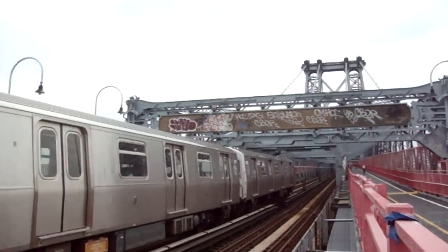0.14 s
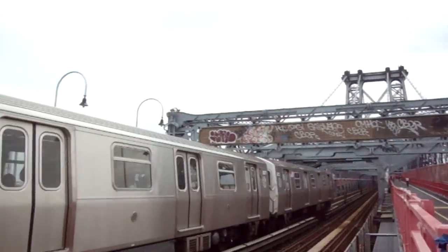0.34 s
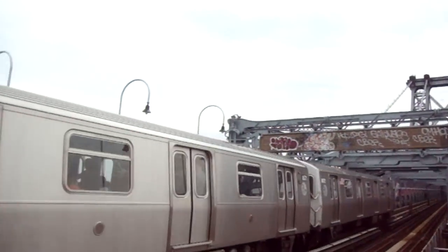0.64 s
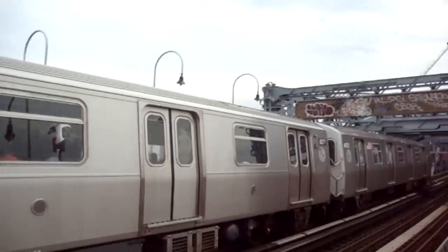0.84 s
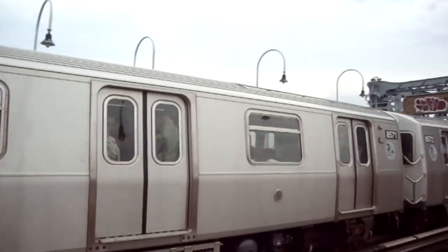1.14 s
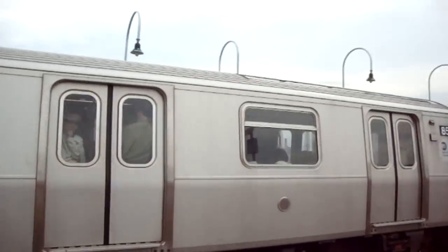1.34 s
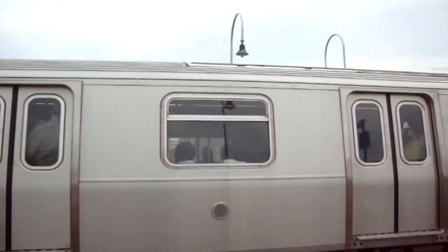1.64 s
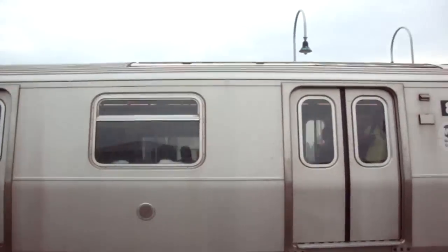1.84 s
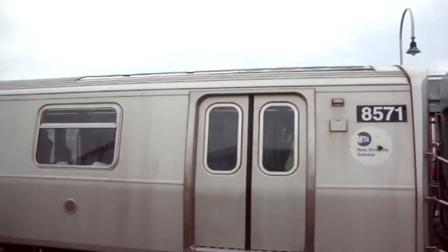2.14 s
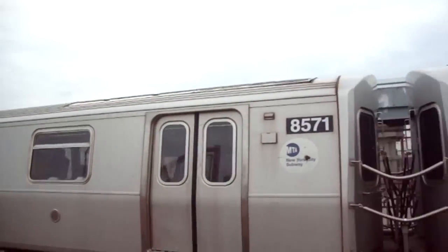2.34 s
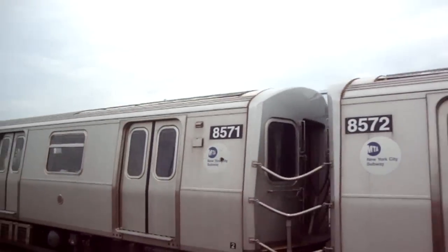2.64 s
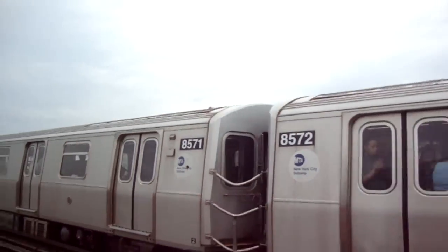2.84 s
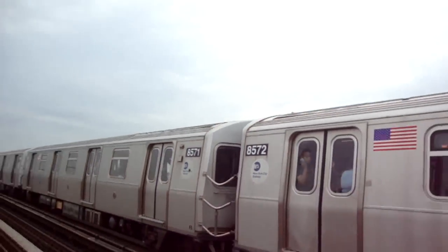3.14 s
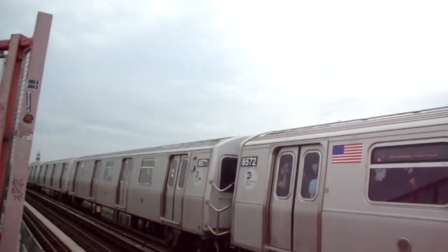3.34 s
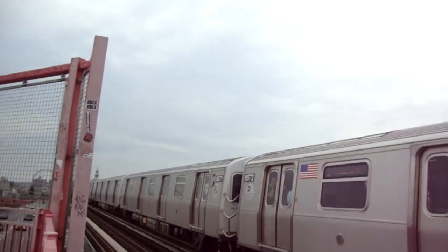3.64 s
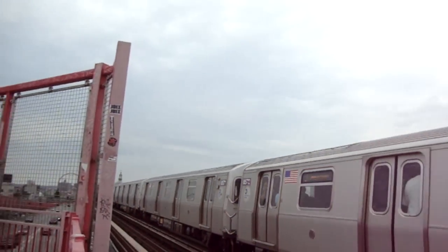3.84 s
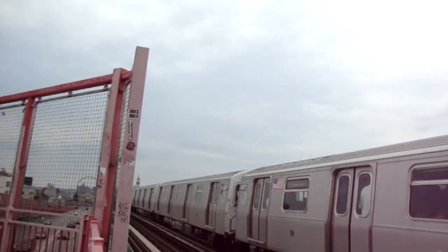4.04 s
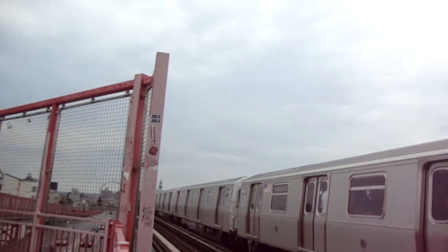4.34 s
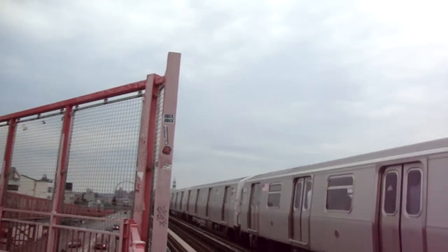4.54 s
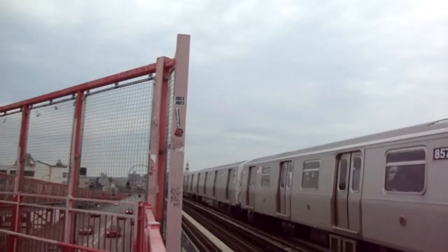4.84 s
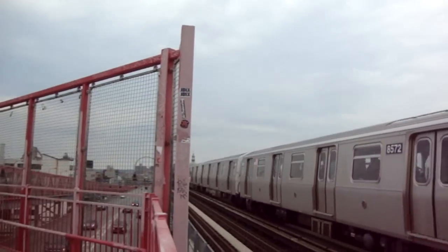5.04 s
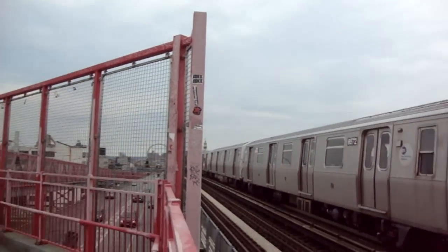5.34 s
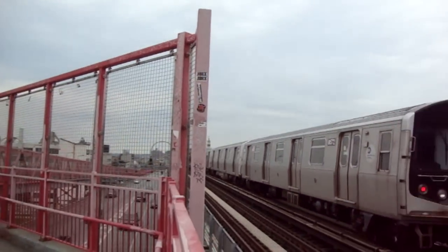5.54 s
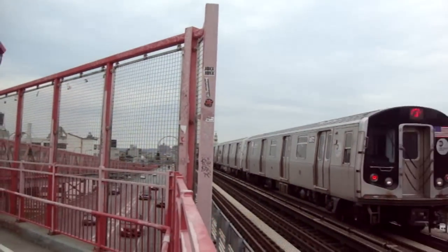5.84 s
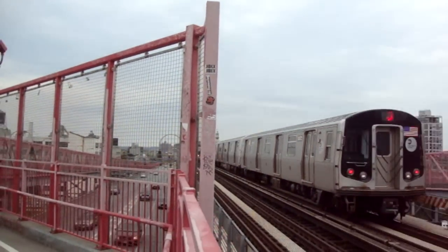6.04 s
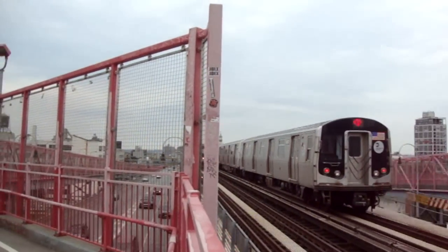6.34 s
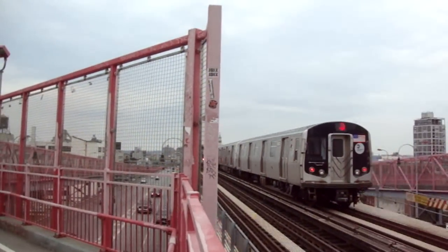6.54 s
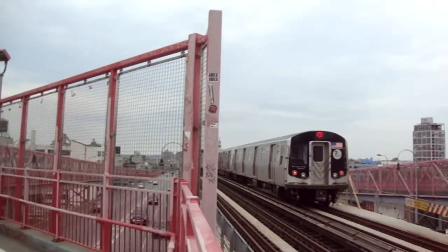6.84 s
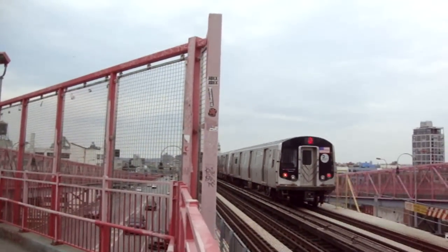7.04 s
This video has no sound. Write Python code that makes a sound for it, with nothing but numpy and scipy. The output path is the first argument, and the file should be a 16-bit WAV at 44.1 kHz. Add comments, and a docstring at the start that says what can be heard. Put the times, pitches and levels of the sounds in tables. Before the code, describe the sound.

Loud, steady steel-on-steel roar of a passing metro train, with rattling double clanks at rail joints, groaning girders and a thin motor whine near the end.

```python
"""First comes the roar of a subway train on a steel bridge, heard from a walkway a few metres away.
Rough wheels shake rail and deck (filtered noise); at rail joints they clash, thud and rattle (noise bursts
and short sine chords). Flanges scrape in swells of noise, and now and then a wheel sings (narrow resonance).
Rail and girders groan on a moving resonance; near the end a low drone and a faint drive whine appear."""
import sys
import numpy as np
from scipy import signal
from scipy.fft import rfft, irfft, next_fast_len
from scipy.io import wavfile
from scipy.ndimage import uniform_filter1d

SR = 44100
rng = np.random.default_rng(int(sys.argv[2]) if len(sys.argv) > 2 else 0)


def to_wav(s):
    """Save 16-bit WAV."""
    ch = np.atleast_2d(s).T  # columns
    pcm = np.round(np.clip(ch, -1, 1) * 32767)  # PCM
    wavfile.write(sys.argv[1], SR, pcm.astype(np.int16))


N = 316631
T = np.arange(N) / SR
FFT_SIZE = next_fast_len(N, real=True)
HZ = np.maximum(np.arange(FFT_SIZE // 2 + 1) * SR / FFT_SIZE, 1)

# rumble, hiss and sizzle start a steady extra fade at this moment
PASS_S = 1.05
RUMBLE_FADE_DB_PER_S, HISS_FADE_DB_PER_S, SIZZLE_FADE_DB_PER_S = 0.3, 0.77, 2
# the two axles of a bogie (a wheel frame under the car) reach the same spot one after the other
AXLE_GAP_S = 0.271

# swell of the rolling wheels as each pair of bogies comes by: (time [s], base level [dB])
ROLLING_LEVEL = [(0, -20), (.25, -19), (1.1, -19.5), (1.62, -23), (1.85, -23.5), (2.05, -21), (2.35, -21.5),
                 (2.65, -19.5), (3.15, -21), (3.65, -20), (3.92, -21.5), (4.22, -19), (4.9, -20.5),
                 (5.45, -22), (5.95, -18.5), (7.18, -18)]
MEAN_ROLL_DB = -20.5


def rolling():
    """Rough wheel and rail make the rail roar, the deck rumble and the contact hiss."""
    base_db, = curves(ROLLING_LEVEL)
    swell_db = base_db - MEAN_ROLL_DB
    return rail_roar(base_db) + deck_rumble(swell_db) + contact_hiss(swell_db)


# tone of the shaken rail: (frequency [Hz], relative level [dB per Hz])
RAIL_TONE = [(300, -28.5), (480, -7.5), (620, -1), (800, -2.5), (1000, -1.5), (1300, -3.5), (1650, -6.5),
             (2100, -13), (3200, -35.5)]


def rail_roar(base_db):
    """Thousands of tiny collisions a second shake the rail, which colours them into a roar."""
    roar = colour(impacts(rate=9000, spread_db=0.5), RAIL_TONE)
    return roar * undb(base_db + 2.5 + 0.53 * walk(35))


def deck_rumble(swell_db):
    """The deck rumbles under the wheels and follows most of their swell."""
    level_db = MEAN_ROLL_DB - 5 + 0.9 * swell_db
    level_db = level_db - RUMBLE_FADE_DB_PER_S * since_pass(T)
    return deck_noise() * undb(level_db + 0.6 * walk(14))


# tone of the contact between wheel and rail: (frequency [Hz], relative level [dB per Hz])
CONTACT_TONE = [(1200, -24), (2000, 1), (2700, 4.5), (4200, 0), (5500, -2.5), (7200, -10), (8400, -13),
                (10000, -21)]


def contact_hiss(swell_db):
    """Fine collisions hiss at the contact, with a faint ring of the wheels mixed in."""
    level_db = MEAN_ROLL_DB - 4 + 0.5 * swell_db
    level_db = level_db - HISS_FADE_DB_PER_S * since_pass(T)
    contact = colour(impacts(rate=14000, spread_db=5.0), CONTACT_TONE)
    contact = contact + undb(-24.5) * wheel_ringing()
    return contact * undb(level_db + 0.5 * walk(25))


# tone of the shaken deck: (frequency [Hz], relative level [dB per Hz])
DECK_TONE = [(25, -29), (55, -27), (78, -19), (125, -13), (175, -3), (250, -1), (345, 1.5), (460, -0.5),
             (650, -9), (1200, -39.5)]


def deck_noise():
    """Random shaking, coloured by the body of the deck."""
    return colour(rng.standard_normal(N), DECK_TONE)


# tones of the clashing steel, the sizzling tread and the thudding deck:
# (frequency [Hz], relative level [dB per Hz])
CLASH_TONE = [(600, -4), (1300, -10), (2000, 3.5), (3000, 3), (4400, -0.5), (6000, -8.5), (8000, -15),
              (10000, -31)]
SIZZLE_TONE = [(2500, -19), (4500, -0.5), (6500, 1.5), (7600, -2.5), (8400, -1), (10000, -8)]
THUD_TONE = [(90, -30), (180, -17), (330, -8), (480, 1.5), (680, 4.5), (1100, 1), (1700, -9), (3000, -22.5)]
# low resonances of the hollow deck: (frequency [Hz], width [Hz], relative level [dB])
HOLLOW_MODES = [(175, 62, -3), (347, 105, 1.5)]


def joints():
    """A wheel drops on the next rail: deck thuds and booms, steel rings, tread sizzles, running gear rattles."""
    clash, sizzle, thud, boom, ringing = 0, 0, 0, 0, 0
    for s, clash_db, thud_db, boom_db, t60 in axle_hits():
        rattle_power = strike(s, t60, rise=0.0032, hold=0.0086) ** 2
        # the first bite of steel on steel, 3 dB under the clash
        crack = undb(-3) * strike(s, t60=0.035, rise=0.0007, hold=0.0024)
        sizzle_db = clash_db - 5.5 - SIZZLE_FADE_DB_PER_S * since_pass(s)
        deck_t60 = 0.74 * t60
        thud_shape = strike(s, deck_t60, rise=0.0014, hold=0.029)
        boom_shape = strike(s, deck_t60, rise=0.015, hold=0.041)
        # overlapping blows add in power
        clash = clash + undb(clash_db) ** 2 * (rattle_power + crack ** 2)
        sizzle = sizzle + undb(sizzle_db) ** 2 * rattle_power
        thud = thud + (undb(thud_db) * thud_shape) ** 2
        boom = boom + (undb(boom_db) * boom_shape) ** 2
        ringing = ringing + clang(s, clash_db - 5, t60)
    steel = colour(impacts(rate=9000, spread_db=2.5), CLASH_TONE) * undb(1.0 * walk(90) - 0.56)
    tread = colour(impacts(rate=16000, spread_db=-1.0), SIZZLE_TONE) * undb(2.1 * walk(70))
    tread = tread + undb(-10) * wheel_ringing()
    deck = colour(impacts(rate=5000, spread_db=1.5), THUD_TONE)
    hollow = ring(deck_noise(), HOLLOW_MODES)
    metal = np.sqrt(clash) * steel + ringing + np.sqrt(sizzle) * tread
    return metal + np.sqrt(thud) * deck + np.sqrt(boom) * hollow


# bogies crossing rail joints; base levels, with the rattle's time to fall by 60 dB:
# (time of first axle [s], first clash [dB], second clash [dB], thud [dB], boom [dB], rattle t60 [s])
BOGIE_HITS = [(.092, -30, -26, -24, -23.5, 0.9), (.244, -27, -25, -18, -27, .3),
              (.885, -24, -27, -28, -37, 1), (1.104, -19, -18.5, -22, -36, 0.62),
              (1.741, -15.5, -20, -24, -40, 0.53), (1.881, -21.5, -22.5, -19.5, -27, 0.99),
              (2.506, -24.5, -21, -18, -22, 0.62), (2.650, -17, -16.5, -17.5, -35, 0.2),
              (3.273, -16.5, -20, -16.5, -35, 0.35), (3.482, -18.5, -18.5, -14.5, -27, .43),
              (4.239, -21, -22.5, -19.5, -19, 0.63), (4.975, -20.5, -15, -16, -29, 0.31),
              (5.012, -19, -36, -19, -24, .4), (5.752, -18, -17.5, -25, -30, 0.36),
              (6.095, -33, -23, -30, -34, .13), (6.572, -22, -21, -22, -37, .3)]


def axle_hits():
    """Each bogie strikes twice: (time [s], clash [dB], thud [dB], boom [dB], rattle t60 [s])."""
    for s, first_db, second_db, thud_db, boom_db, t60 in BOGIE_HITS:
        yield s, first_db, thud_db, boom_db, t60
        # the trailing axle shakes the deck a little less
        yield s + AXLE_GAP_S, second_db, thud_db - 1.5, boom_db - 1.5, t60


def clang(s, db, t60, count=60, low_hz=1200, high_hz=5500):
    """Each blow wakes its own crowd of steel modes in wheel, rail and frame."""
    age = np.arange(int(0.3 * SR)) / SR
    place, phase, size = rng.random((3, count, 1))
    hz = low_hz * (high_hz / low_hz) ** place
    # higher modes are weaker
    strength = size * (low_hz / hz) ** 0.6
    modes = np.sum(strength * np.sin(2 * np.pi * (hz * age + phase)), axis=0)
    sound = unit(modes) * undb(db - 60 * age / t60)
    return np.pad(sound, (max(int(s * SR), 0), N))[:N]


# tone of the grinding flange: (frequency [Hz], relative level [dB per Hz])
SCRAPE_TONE = [(900, -13.5), (2000, 0.5), (3300, -2), (5000, -4), (6700, -6.5), (7600, -9), (8400, -12.5),
               (10000, -17)]
# bogies rubbing their flanges on the rail; the levels set the pressure:
# (time of first peak [s], first axle [dB], second axle [dB], time to fall by 60 dB [s])
FLANGE_RUBS = [(.15, -20, -20.5, 0.68), (.66, -24, -36, 0.36), (1.935, -19.5, -24.5, 0.94),
               (2.552, -19, -22, 1), (3.54, -24, -40, .4), (4.03, -27.5, -19.5, 0.43),
               (4.80, -26, -24, 0.26), (6.56, -25.5, -33, 0.36)]


def flanges():
    """Flanges grind along the rail in swells, one for each axle; the wheel rings with each rub."""
    power = 0
    for s, first_db, second_db, t60 in FLANGE_RUBS:
        first = undb(first_db) * blow(s, rise=0.02, t60=t60)
        second = undb(second_db) * blow(s + AXLE_GAP_S, rise=0.02, t60=t60)
        power = power + first ** 2 + second ** 2
    pressure = np.sqrt(power)
    grind = colour(impacts(rate=11000, spread_db=6.0), SCRAPE_TONE)
    return pressure * (undb(-1.0) * grind + undb(-9.0) * wheel_ringing())


# resonances of a rubbed wheel: (frequency [Hz], width [Hz], relative level [dB])
WHEEL_MODES = [(2900, 50, -10), (3350, 56, 11.5), (3750, 53, -8), (4450, 46, 8), (5590, 160, 6.5),
               (7200, 60, -4), (7900, 35, -10), (7870, 44, -13), (8350, 50, 5.5)]


def wheel_ringing():
    """Noise shakes a steel wheel, which rings at its own pitches."""
    return ring(rng.standard_normal(N), WHEEL_MODES)


# single wheel modes singing: (time of peak [s], half length [s], frequency [Hz], level [dB])
WHEEL_SQUEALS = [(.42, .064, 8020, -34), (1.17, 0.042, 8560, -33), (1.23, 0.071, 4440, -30.5),
                 (1.44, 0.056, 8360, -40), (1.54, 0.058, 4370, -32), (1.76, 0.027, 6750, -31.5),
                 (2.3, 0.11, 3370, -26), (2.48, .08, 4440, -34), (2.93, .08, 3430, -33),
                 (3.16, .08, 3940, -33.5), (4.76, .06, 4400, -37)]


def squeals():
    """A rubbed wheel sings on one of its modes for a moment."""
    return swells(WHEEL_SQUEALS, width_hz=75, steadiness=0.29)


# wheels on rough stretches of rail: (time of peak [s], half length [s], frequency [Hz], level [dB])
ROUGH_STRETCHES = [(4.2, 0.11, 1067, -16.5), (7.08, 0.34, 1300, -21)]


def rasps():
    """Wheels rasp over rough rail: broad, unsteady resonances swell and fade."""
    return swells(ROUGH_STRETCHES, width_hz=620, steadiness=0.13)


# groan of rail and girders, which shifts as the wheels move along the span:
# (time [s], base centre [Hz], base level [dB])
GROAN_PATH = [(0, 778, -31), (.3, 775, -22), (.8, 816.4, -22.5), (1.1, 742, -20), (1.55, 770, -32),
              (2.0, 818, -25.5), (2.35, 785.6, -27.5), (2.7, 736, -24.5), (3.3, 601.6, -27),
              (3.95, 552.4, -33.5), (4.3, 803, -28.5), (4.8, 818, -24.5), (5.45, 800, -35),
              (5.85, 816, -22), (6.35, 850, -25.5), (7.18, 885, -26.5)]


def girders():
    """Rail and girders groan under the wheels; uneven rail shifts the pitch and makes it surge."""
    centre_hz, level_db = curves(GROAN_PATH)
    centre_hz = centre_hz + 32 * walk(11)
    level_db = level_db + 2.15 * walk(13)
    return undb(level_db) * resonance(centre_hz, width_hz=150, steadiness=0.18)


def drone():
    """A low, wavering drone grows behind the departing train, then holds its level."""
    start_s, rise_s, level_db = 5.6, 0.5, -27
    growth = np.clip((T - start_s) / rise_s, 0, 1)
    return undb(level_db) * growth * resonance(644, width_hz=45, steadiness=0.22)


# pitches of the drive whine: (frequency [Hz], width [Hz], relative level [dB])
DRIVE_MODES = [(2353, 35, -1.5), (2507, 26, 0), (2650, 43, -7), (3910, 53, -6), (7580, 50, -16.5)]
# loudness of the whine: (time [s], level [dB])
WHINE_LEVEL = [(0, -61), (4.5, -46), (4.82, -29), (5.6, -29.5), (6.05, -30), (7.18, -36)]


def drive():
    """Thin whine of motors and gears behind the last car: noise through narrow resonances."""
    level_db, = curves(WHINE_LEVEL)
    return ring(rng.standard_normal(N), DRIVE_MODES) * undb(level_db)


def undb(db):
    """Turn decibels into gain."""
    return 10 ** (np.asarray(db) / 20)


def unit(x):
    """Scale to rms (average strength) 1."""
    return x / np.sqrt(np.mean(x ** 2))


def curves(table):
    """Draw each column of a timed table as a curve, with straight lines between its points."""
    s, *columns = np.transpose(table)
    return [np.interp(T, s, column) for column in columns]


def since_pass(s):
    """Seconds for which the extra fade has been running."""
    return np.maximum(s - PASS_S, 0)


def walk(rate):
    """Random levels, rate per second, smoothed twice and scaled to rms 1."""
    k = max(int(SR / rate), 1)
    steps = rng.standard_normal(N)[np.arange(N) // k]
    return unit(uniform_filter1d(uniform_filter1d(steps, k), k))


def impacts(rate, spread_db):
    """Dense tiny collisions of steel on steel, of unequal size; rms 1."""
    happens = rng.random(N) < rate / SR
    size = undb(spread_db * np.minimum(rng.exponential(size=N), 3))
    return unit(happens * size * np.sign(rng.standard_normal(N)))


def colour(x, spectrum):
    """Pass x through a body with the given broad spectrum; rms 1."""
    hz, db = np.transpose(spectrum)
    slope_db = np.interp(np.log(HZ), np.log(hz), db)
    # beyond both ends of the table the sound falls away
    outside = np.minimum(HZ / hz[0], 1) * np.minimum(hz[-1] / HZ, 1)
    return unit(irfft(rfft(x, FFT_SIZE) * undb(slope_db) * outside ** 2, FFT_SIZE)[:N])


def ring(x, modes):
    """Pass x through a set of resonances; rms 1."""
    response = 0
    for hz, width, db in modes:
        detuning = (HZ / hz - hz / HZ) * hz / width
        response = response + undb(db) / np.sqrt(width) / (1 + 1j * detuning)
    return unit(irfft(rfft(x, FFT_SIZE) * response, FFT_SIZE)[:N])


def blow(s, rise, t60):
    """Envelope that swells to its peak at s and then dies away, by 60 dB in t60 seconds."""
    age = T - s
    before, after = np.minimum(age, 0), np.maximum(age, 0)
    return np.exp(-(before / rise) ** 2 - np.log(1000) * after / t60)


def strike(s, t60, rise, hold):
    """Envelope of a blow at s: a quick rise, a short bounce at full strength, then a decay."""
    live = slice(*np.searchsorted(T, [s, s + hold + t60]))
    age, out = T[live] - s, np.zeros(N)
    decay = np.exp(-np.log(1000) * np.maximum(age - hold, 0) / t60)
    out[live] = np.minimum(age / rise, 1) * decay
    return out


def resonance(hz, width_hz, steadiness):
    """A narrow resonance of rms 1, fixed or moving; steadiness 1 sustains itself, 0 is driven by roughness."""
    # slow random amplitude and phase, made at 2048 points a second; width_hz sets their speed
    offset_hz = np.fft.fftfreq(16384, 1 / 2048)
    push = rng.standard_normal((len(offset_hz), 2)) @ [1, 1j]
    motion = np.fft.ifft(push / (1 + (offset_hz / (width_hz / 2)) ** 2))
    # steadiness evens out the amplitude
    motion = motion / np.abs(motion) ** steadiness
    motion = np.interp(T, np.arange(16384) / 2048, motion)
    cycles = np.cumsum(hz * np.ones(N)) / SR
    return unit(np.real(motion * np.exp(2j * np.pi * cycles)))


def swells(table, width_hz, steadiness):
    """Resonances that swell and fade, one for each row."""
    total = 0
    for s, half_s, hz, db in table:
        shape = np.exp(-((T - s) / half_s) ** 2)
        total = total + undb(db) * shape * resonance(hz, width_hz, steadiness)
    return total


def scene():
    """The whole train, in mono."""
    train = rolling() + joints() + flanges() + squeals() + rasps()
    return (train + girders() + drone() + drive())[None]


def record(dry):
    """A small camera rounds the highest peaks and cuts the top steeply above 10050 Hz."""
    rounded = dry / (1 + dry ** 6) ** (1 / 6)
    low_pass = signal.ellip(12, 0.1, 80, 10050, fs=SR, output="sos")
    return signal.sosfilt(low_pass, rounded)


dry = scene()
out = record(dry)
to_wav(out)
```